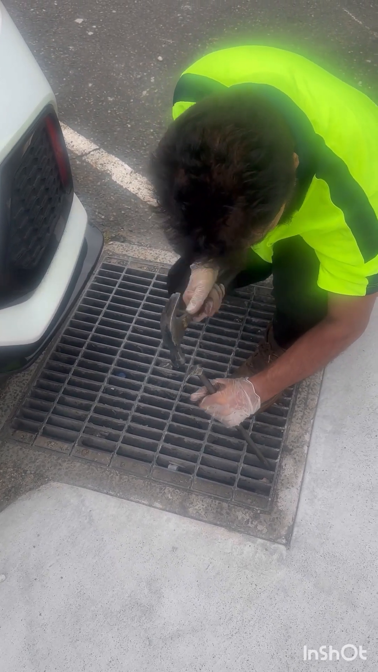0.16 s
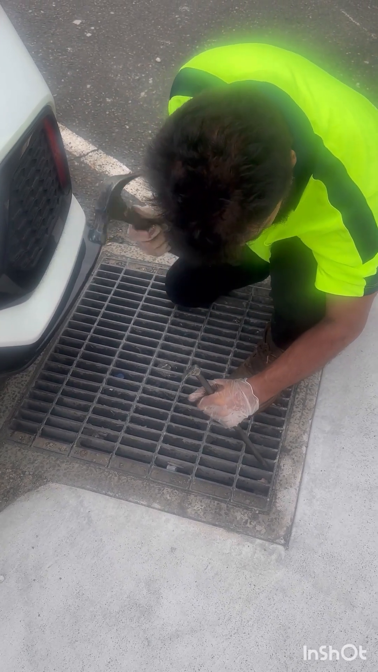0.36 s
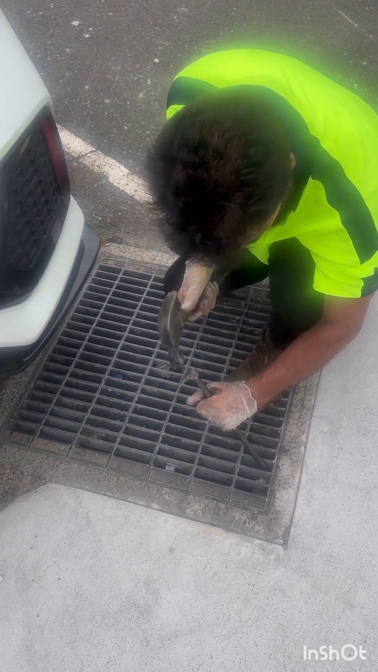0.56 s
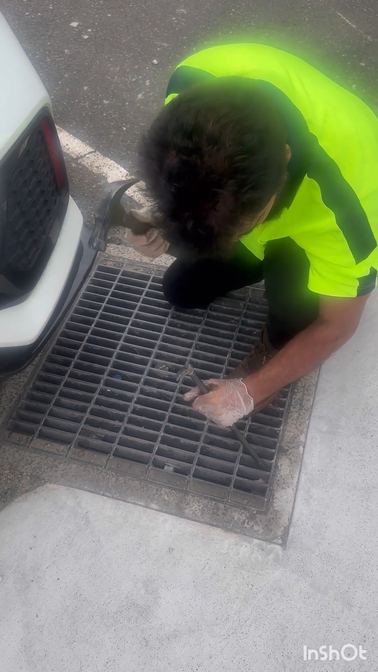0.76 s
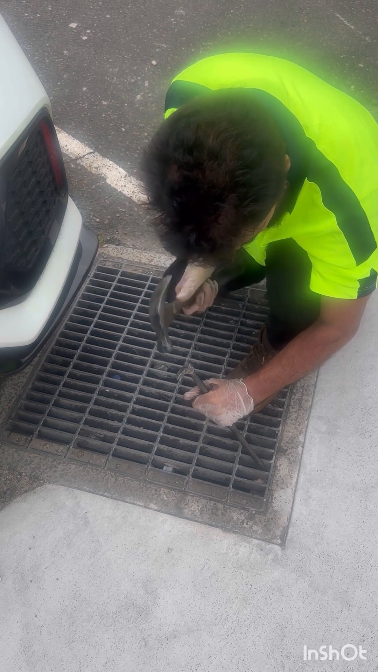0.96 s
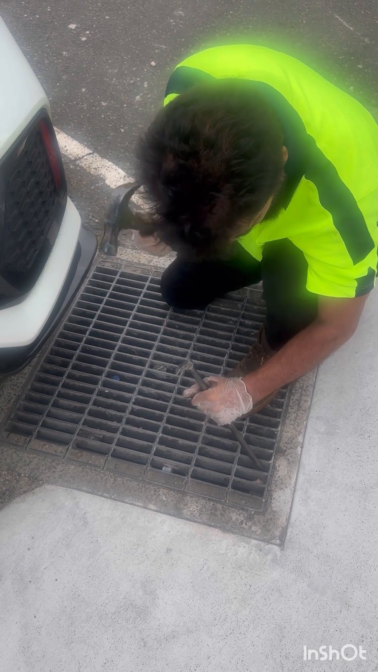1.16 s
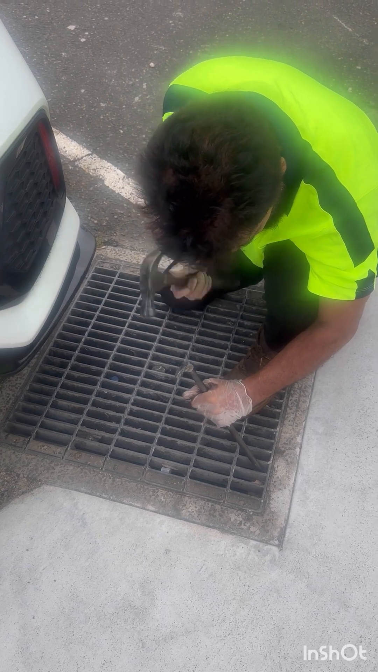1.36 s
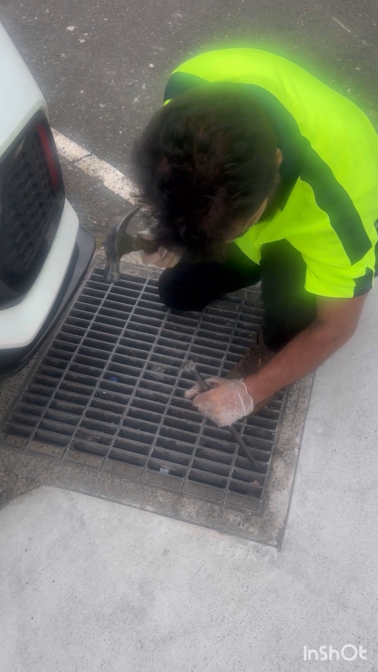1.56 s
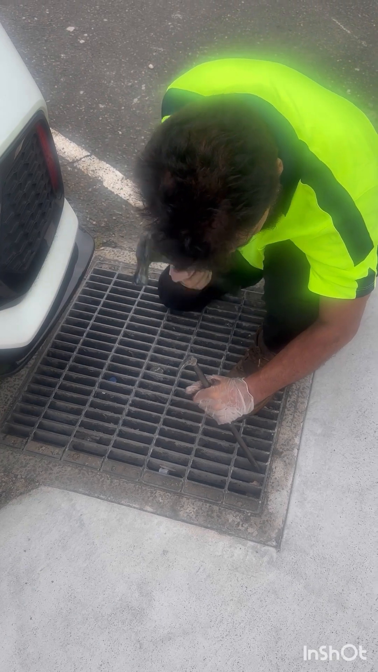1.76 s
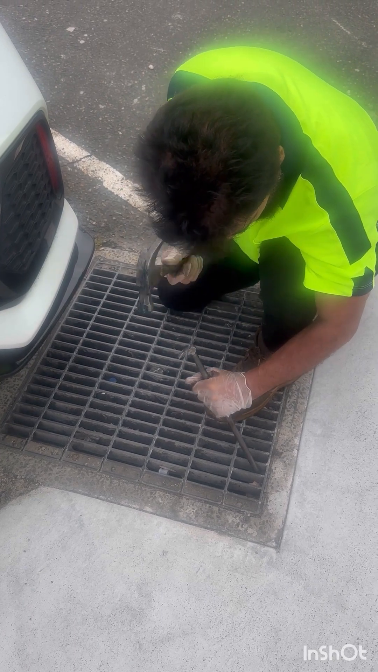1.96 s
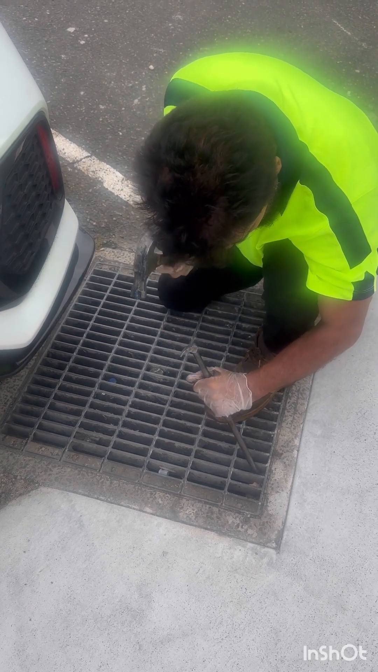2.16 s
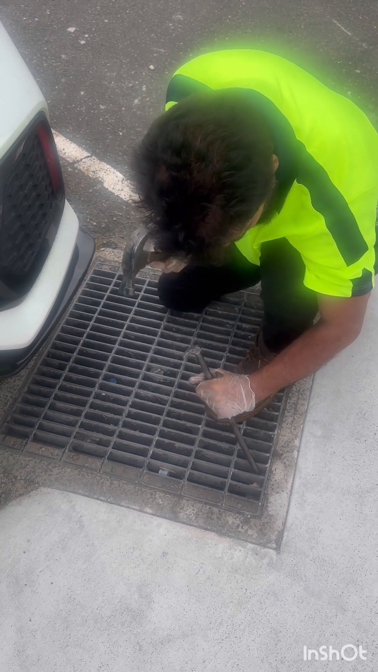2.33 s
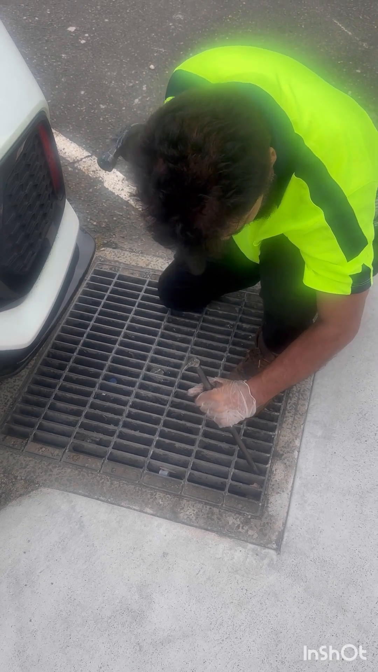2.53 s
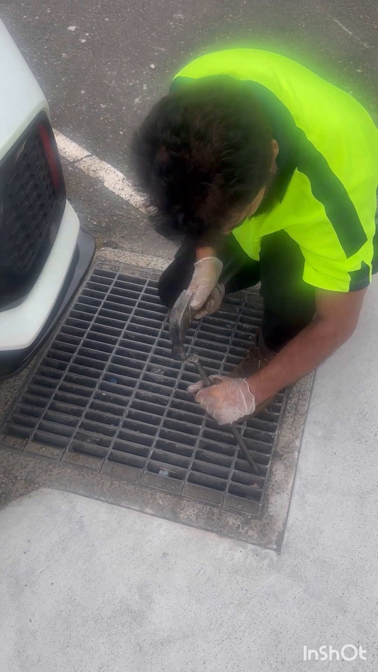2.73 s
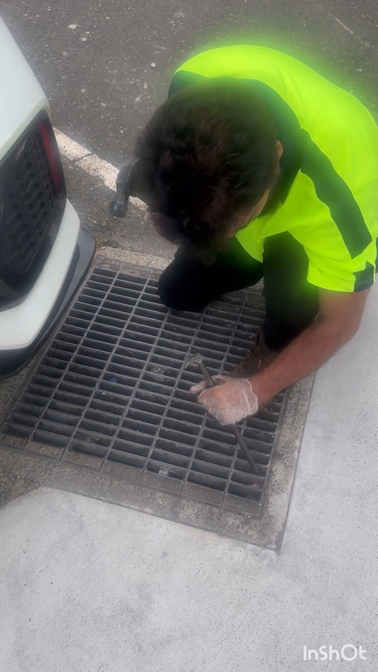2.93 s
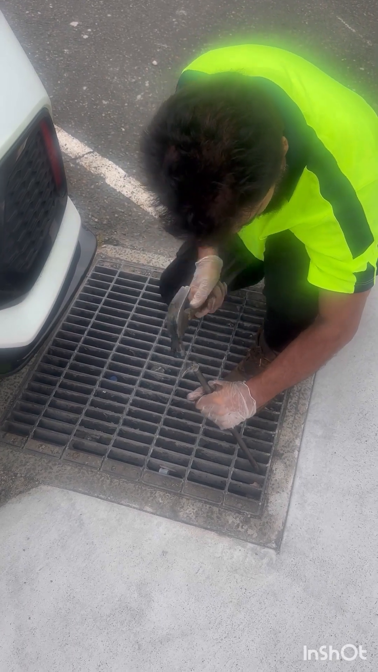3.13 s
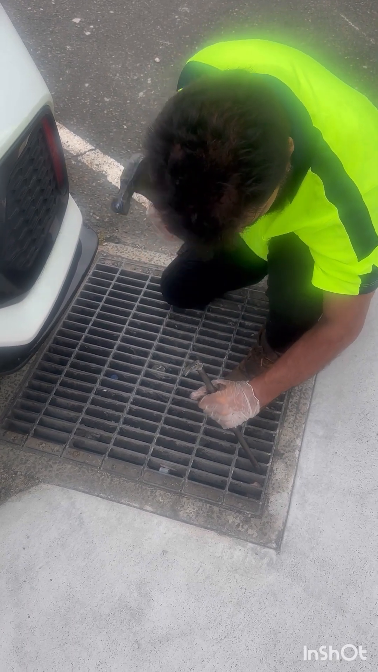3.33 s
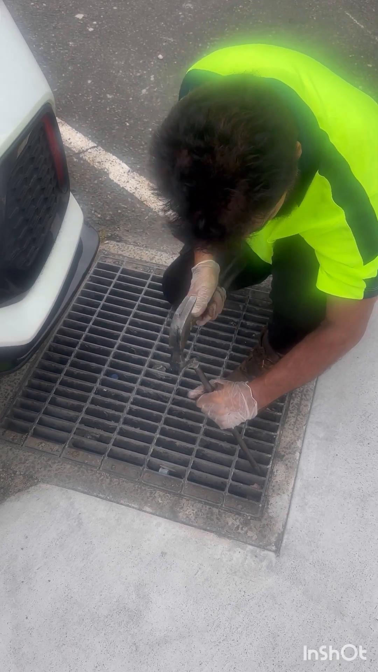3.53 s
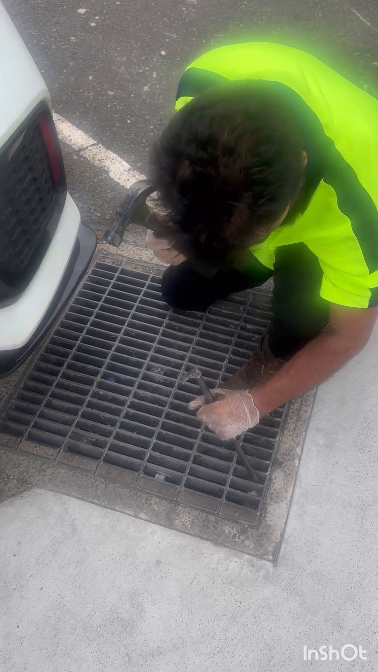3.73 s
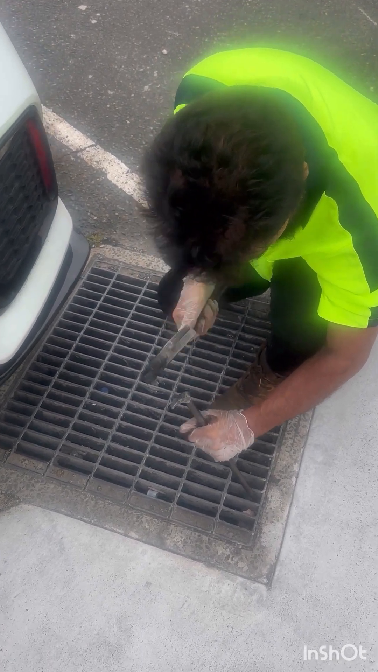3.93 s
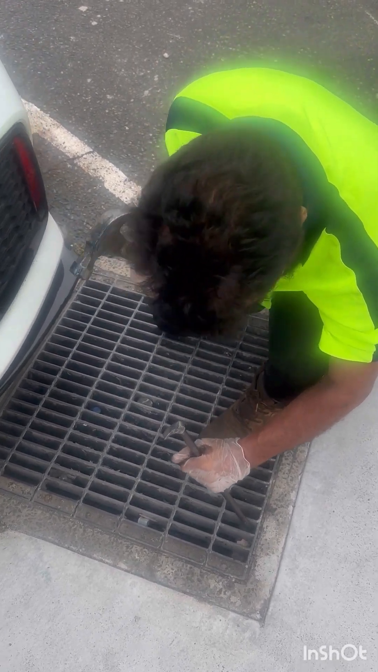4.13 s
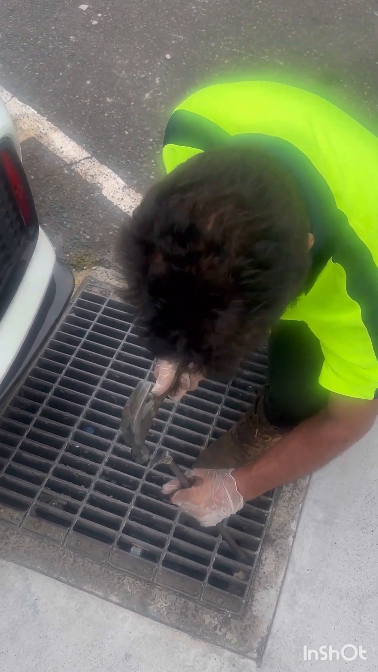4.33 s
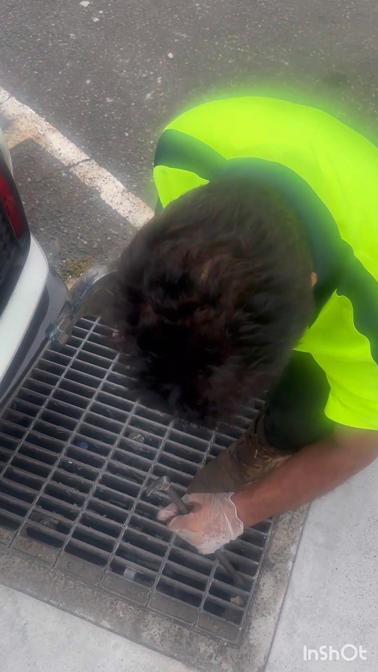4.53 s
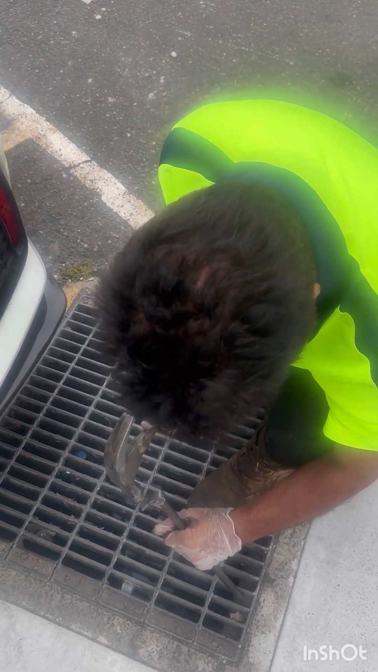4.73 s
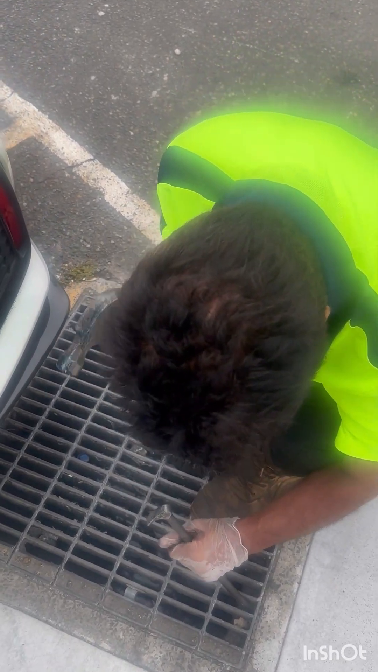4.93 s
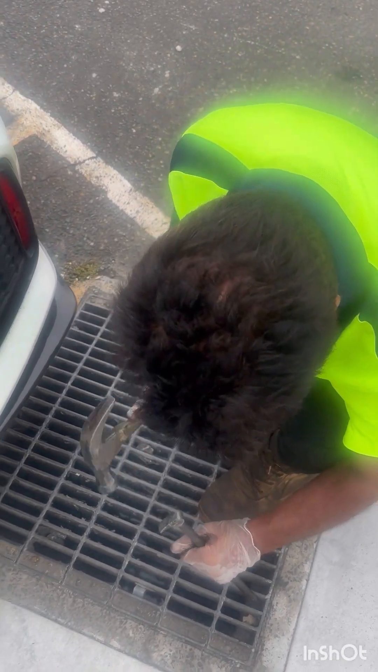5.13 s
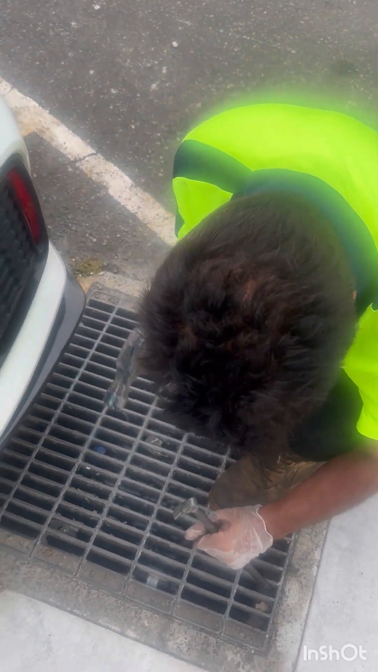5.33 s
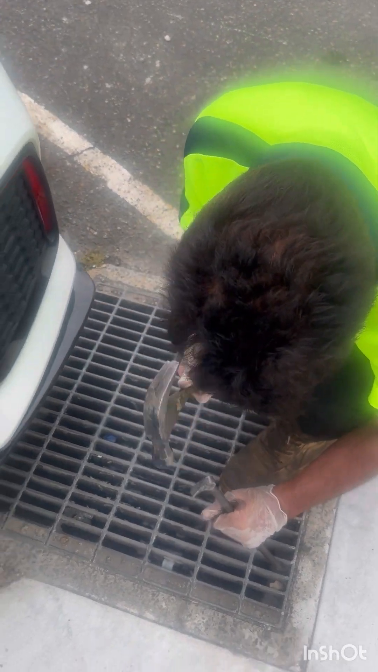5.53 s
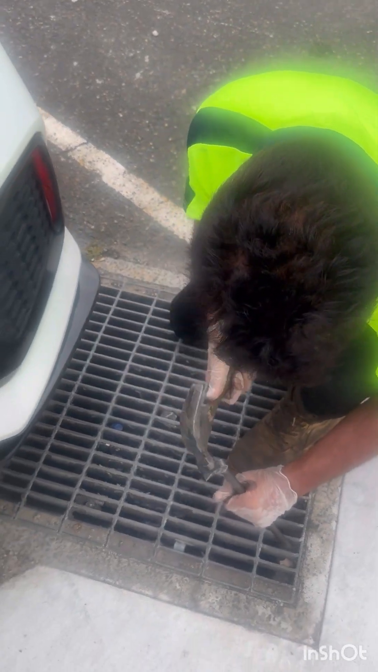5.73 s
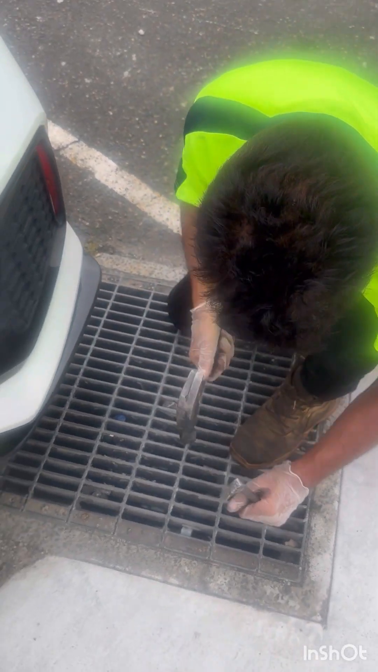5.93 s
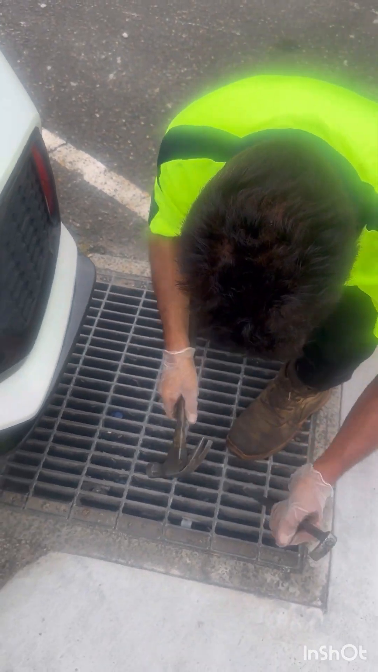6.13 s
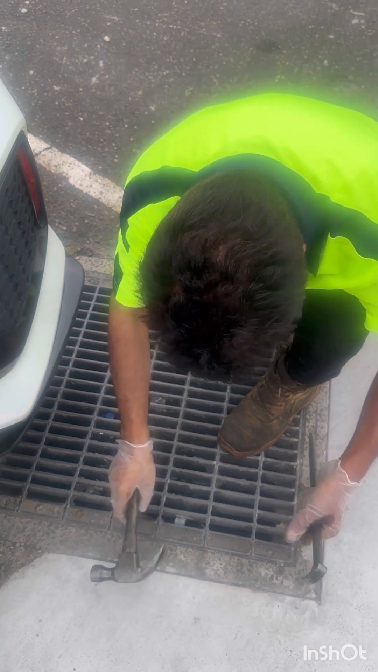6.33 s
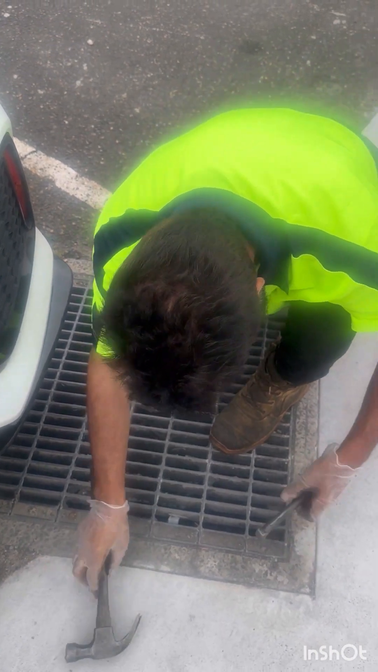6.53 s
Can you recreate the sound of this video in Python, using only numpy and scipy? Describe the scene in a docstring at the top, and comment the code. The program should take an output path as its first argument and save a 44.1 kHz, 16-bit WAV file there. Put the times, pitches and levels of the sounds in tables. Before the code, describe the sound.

Outdoors at a roadside drain, a phone close by picks up a hammer hitting a steel bar wedged in a metal grate. The tail of an earlier blow is present at the start, with soft wind buffeting that dies by about 2 s. Loud, piercing clanks land at 0.13, 0.55, 0.96, 1.37 and 1.78 s; the one at 0.96 carries a deep thump. After a missed beat, blows resume at 2.67 s and continue every 0.4 s or slightly faster until 5.72 s. Each is an abrupt bright crack, a dense short rattle with a tiny rebound, a quickly damped ring and a hissy echo from car and walls. Faint traffic rumble and engine hum lie beneath. From 6 s only echo, tiny ticks and scuffs remain; at 6.55 s the hammer taps concrete, slightly right, with small fading clinks until the end.

```python
"""Outdoors, at a drain grate near traffic: a hammer drives a steel bar wedged in the grate, close to a phone.
Each blow is a burst of contact noise that excites damped modes of bar and grate, a dense rattle and a thud,
all but the thud echoed by a car and far walls as decaying noise. The hammer is then laid on concrete, where it taps and rings.
Ticks, scuffs and a thin tone are faint; traffic is shaped noise with narrow hums; gusts buffet at first."""
import sys
import numpy as np
from scipy import signal
from scipy.fft import rfft, irfft, next_fast_len
from scipy.io import wavfile
from scipy.ndimage import map_coordinates

SR = 44100
rng = np.random.default_rng(int(sys.argv[2]) if len(sys.argv) > 2 else 0)


def to_wav(s):
    """Save 16-bit WAV."""
    ch = np.atleast_2d(s).T  # columns
    pcm = np.round(np.clip(ch, -1, 1) * 32767)  # PCM
    wavfile.write(sys.argv[1], SR, pcm.astype(np.int16))


N = 295029

# Hammer blows: (time [s], level [dB]; then relative to that level: first bar mode [dB], second bar mode [dB],
# treble bar mode [dB], low grate [dB], middle grate [dB], upper grate [dB], thud [dB];
# then rebound delay [s], rebound gain [dB])
BLOW_ROWS = [(0.1336, -3, -22.5, -28, -23.5, -31, -23, -26.5, -23, 0.023, 1.5),
             (0.5535, -5, -25, -22.5, -22, -29, -21.5, -25.5, -19.5, 0.029, 3),
             (0.9589, -5.5, -23.5, -18.5, -21, -27.5, -25, -27.5, 2, 0.024, 0.5),
             (1.3744, -3.5, -30, -24, -26, -27.5, -28, -29, -24, 0.02, -4),
             (1.7836, -4, -25.5, -18, -24, -24, -17.5, -24.5, -23.5, 0.0066, -3.5),
             (2.674, -2, -26, -20, -32, -26.5, -37, -30.5, -23, 0.019, 3),
             (3.0963, -3.5, -17.5, -23.5, -26.5, -25, -26.5, -28, -23.5, 0.0149, -1),
             (3.499, -3, -20.5, -30.5, -37, -29, -24.5, -27, -23.5, 0.023, 0),
             (3.8733, -4, -13, -34.5, -31.5, -31, -25, -30.5, -32, 0.017, 0.5),
             (4.2546, -3.5, -18, -19, -31.5, -26, -35.5, -29, -26.5, 0.02, -5),
             (4.6298, -4, -19.5, -18.5, -31, -24, -28.5, -27, -25.5, 0.013, -4.5),
             (5.0036, -4.5, -21.5, -23.5, -28, -30, -22.5, -26, -16.5, 0.016, 2.5),
             (5.3713, -5.5, -22.5, -16, -25.5, -19.5, -25, -26, -18, 0.016, -1.5),
             (5.719, -5.5, -19, -22.5, -21, -22, -21, -24, -21.5, 0.0092, 0.5)]
EARLIER_S = -0.48  # one more blow falls just before the start
LEAD = SR // 2  # samples kept ahead of the start for it


def blows():
    """Superposition: direct sound, low thud and echoes of successive blows add linearly."""
    direct, low = np.zeros(N + 3 * SR), np.zeros(N + 3 * SR)
    echoes = np.zeros((2, N + 3 * SR))
    t = np.arange(SR // 2) / SR
    for s, db, *bar_db, low_db, middle_db, upper_db, thud_db, again_s, again_db in [
            (EARLIER_S, *BLOW_ROWS[0][1:]), *BLOW_ROWS]:
        regions_db = [low_db, middle_db, upper_db]
        blow = amp(db) * strike(t, bar_db, regions_db, thud_db, again_s, again_db)
        at = LEAD + round(s * SR)
        direct[at:][:len(t)] += blow
        # the shock reaches both ports alike
        low[at + SR // 550:][:len(t)] += amp(db + thud_db) * push(t, width_s=0.0023)
        echo = reflected(blow)
        echoes[:, at + SR // 100:][:, :echo.shape[1]] += echo
    echoes = filtered(echoes, lambda hz: amp(along(ECHO_RESPONSE, hz)))
    return (near(direct) + low + far(echoes))[:, LEAD:LEAD + N]


# Centres of the low, middle and upper grate regions: (frequency [Hz])
REGION_CENTRES = [1200, 2000, 3600]


def strike(t, bar_db, regions_db, thud_db, again_s, again_db):
    """Impact excitation: a short contact force sets every part of the structure vibrating at once."""
    colour = list(zip(REGION_CENTRES, regions_db))  # where the blow lands decides which regions ring
    # the bar jumps and meets the grate again
    rebound = 1 + amp(again_db) * np.exp(-((t - again_s) / .0025) ** 2)
    rise = 1 - np.exp(-t / 0.0028)
    ringing = bar_ring(t, bar_db) + grate_ring(t, colour) * rebound + rattle(t, colour, rebound)
    return crack(t, colour) + rise * ringing + frame_knock(t, regions_db, thud_db)


# Spectrum of the steel contact: (frequency [Hz], relative level [dB])
CRACK_SPECTRUM = [(290, -54.5), (500, -25), (1850, -3), (3240, -7.5), (3750, -24.5), (4350, -16),
                  (5040, -19.5), (5670, -0.5), (6760, 4), (9490, -17), (12000, -38), (15400, -32),
                  (16800, -43)]


def crack(t, colour):
    """Contact noise: steel on steel radiates a broadband burst for a few milliseconds."""
    contact = (1 - np.exp(-t / 0.00015)) * np.exp(-(t / 0.0031) ** 2)
    burst = filtered(noise(CRACK_SPECTRUM, len(t)), lambda hz: amp(0.34 * along(colour, hz)))
    return amp(-5.5) * contact * unit(burst)


# First, second and treble bar modes before the hand damps them: (frequency [Hz], t60 [s])
BAR_MODES = [(6164, .16), (6750, .13), (8242, .13)]
# Highest bar modes: (frequency [Hz], relative level [dB], t60 [s])
TOP_MODES = [(14520, -12, .08), (15480, -6, .03), (15850, 0, .025)]
TOP_DB = -1.5  # the highest modes over the treble ring


def bar_ring(t, bar_db):
    """Modal vibration with added damping: the bar rings at fixed modes until the grip absorbs them."""
    modes = [(hz, level_db, t60) for (hz, t60), level_db in zip(BAR_MODES, bar_db)]
    bar = ring(modes, t, scatter_db=1.44, waver=0.024)
    bar = bar * (.12 + .88 * np.exp(-(t / .03) ** 4))  # the gripping hand soon damps the bar
    top = ring(TOP_MODES, t, scatter_db=6, waver=.05)
    return bar + amp(bar_db[-1] + TOP_DB) * top


# Separate grate modes: (frequency [Hz], level within their region [dB], t60 [s])
GRATE_MODES = [(1049, -6, .12), (1146, -5, .22), (1219, -2, .16), (1353, -1, .13), (1426, -6, .12),
               (1772, -3, .12), (1950, -13, .27), (1985, -5, .1), (2150, -3, .11), (2510, -17, .22),
               (2740, -2, .08), (3095, -7, .1), (3262, -3, .09), (3517, -1, .1), (3580, -12, .28),
               (4140, -2, .1), (4570, -9, .13), (4780, -8, .12), (5014, -8, .11), (5680, -9, .11)]


def grate_ring(t, colour):
    """Modal participation: the striking point sets how strongly each grate mode is driven."""
    modes = [(hz, level_db + along(colour, hz), t60) for hz, level_db, t60 in GRATE_MODES]
    return ring(modes, t, scatter_db=2.5, waver=.17)


# Spectrum imposed on the rattle: (frequency [Hz], relative level [dB])
RATTLE_SPECTRUM = [(290, -34), (500, -22.5), (930, -21), (1200, -14), (1600, -11.5), (1750, -6.5),
                   (2180, -6), (2390, -14.5), (3620, -2), (5330, -2), (6310, -3), (10000, -3.5),
                   (11000, -42.5), (14300, -67), (22000, -120)]
# Decay of the rattle: (frequency [Hz], t60 [s])
RATTLE_DECAY = [(300, 0.37), (800, 0.32), (2000, .13), (5500, 0.093), (14000, 0.036)]
RATTLE_DB = 8  # the rattle over the levels of the grate regions


def rattle(t, colour, rebound):
    """High modal density: modes too many to tell apart act as noise with a decay for each frequency."""
    chatter = amp(4.82 * map_coordinates(rng.standard_normal(200), [t * 300])) * rebound
    x = filtered(fading(RATTLE_DECAY, len(t)) * chatter, lambda hz: amp(along(RATTLE_SPECTRUM, hz)))
    x = x / x[:SR // 200].std()  # level set over the first 5 ms
    return filtered(x, lambda hz: amp(along(colour, hz) + RATTLE_DB))


# Modes of the grate's frame: (frequency [Hz], relative level [dB], t60 [s])
FRAME_MODES = [(314.4, -1, 0.076), (632.3, -11, .07), (872.4, -11.5, 0.12)]
KNOCK_DB, SHAKE_DB = 2, -22.5  # gain over the grate's mean level; gain of what the thud adds [dB]


def frame_knock(t, regions_db, thud_db):
    """Coupled vibration: grate and thud together drive the low modes of the frame."""
    drive = amp(np.mean(regions_db) + KNOCK_DB) + amp(thud_db + SHAKE_DB)
    onset = 1 - np.exp(-t / 0.0031)
    return drive * ring(FRAME_MODES, t, scatter_db=3.5, waver=0.17) * onset


# Decay of the echo from car and kerb: (frequency [Hz], t60 [s])
NEAR_DECAY = [(300, 0.46), (1500, 0.11), (5000, 0.31), (10000, 0.26)]
# Decay of the echo from the far walls: (frequency [Hz], t60 [s])
FAR_DECAY = [(300, 0.9), (1500, 0.68), (5000, 0.99), (10000, 1)]


def reflected(blow):
    """Reverberation by convolution: scattered reflections form a noise-like impulse response."""
    close, distant = [fading(t60, (2, SR)) for t60 in (NEAR_DECAY, FAR_DECAY)]
    tail = amp(-12.5) * close / np.linalg.norm(close[0])
    tail = tail + amp(-26.5) * distant / np.linalg.norm(distant[0])
    return signal.fftconvolve(blow[None], tail, axes=1)


# Filter that blows() puts on all echoes: (frequency [Hz], gain [dB])
ECHO_RESPONSE = [(300, -1), (1000, -4), (3000, -0.5), (3600, -2), (5000, -1.5), (6200, -7), (6800, -0.5),
                 (9000, -4), (10300, -8), (10600, -52), (17000, -57)]
# Contacts of the hammer laid down: (time [s], level [dB], ring relative to that level [dB])
CONTACTS = [(6.538, -28, -23), (6.554, -16.5, -9), (6.5947, -32.5, -8), (6.6121, -36, -3.5),
            (6.627, -36, -27), (6.6338, -40.5, -16), (6.6529, -44, -22)]
# Modes of the hammer: (frequency [Hz], relative level [dB], t60 [s])
HAMMER_MODES = [(1193, -19, 0.091), (1790, -13, 0.039), (2170, -7, 0.033), (2760, -25, 0.023),
                (3100, -16.5, 0.038), (3500, -23, 0.067), (4040, -17.5, 0.023), (4500, -32.5, 0.051),
                (4760, -9, 0.039), (7770, -3, 0.03)]
# Spectrum of steel on concrete: (frequency [Hz], relative level [dB])
TAP_SPECTRUM = [(180, -33), (300, -2.5), (709, 3), (1560, -8), (2340, -0.5), (4760, -6), (6020, -23.5),
                (7890, -7), (8730, -36), (11600, -92), (15700, -33.5), (16800, -72)]


def laid_down():
    """Repeated impact: the hammer head taps the concrete, rocks, and rings briefly in its own modes."""
    out, t = np.zeros(N + SR), np.arange(SR // 5) / SR
    for s, db, ring_db in CONTACTS:
        short = amp(-0.5 - 60 * t / 0.0078) * (1 - np.exp(-t / .0003))
        long = amp(-17.0 - 60 * t / 0.069) * (1 - np.exp(-t / 0.00059))
        tap = short * noise(TAP_SPECTRUM, len(t)) + long * noise(TAP_SPECTRUM, len(t))
        head = (1 - np.exp(-t / 0.00033)) * ring(HAMMER_MODES, t, scatter_db=4.5)
        out[round(s * SR):][:len(t)] += amp(db) * (tap + amp(ring_db) * head)
    return near(out[:N]) * amp([[-2], [2]])  # stronger on the right


def small_sounds():
    """Superposition of weak sources: ticks and scuffs form a diffuse field, the tone is central."""
    return far(ticks() + scuffs()) + thin_tone()


# Faint ticks: (time [s], level [dB], centre [Hz], 1/e half-width [Hz], t60 [s])
TICK_ROWS = [(1.938, -51.5, 2010, 1800, 0.12), (5.334, -47, 1970, 900, 0.073),
             (5.97, -60, 2100, 300, 0.049), (5.971, -63, 8800, 2500, .03),
             (6.124, -60.5, 6000, 6240, 0.015), (6.29, -73, 8660, 2500, .04),
             (6.357, -77, 8300, 1500, 0.019)]


def ticks():
    """Band-limited transients: narrow noise under a fast exponential decay is heard as a tick."""
    out, t = np.zeros((2, N + SR)), np.arange(SR // 5) / SR
    for s, db, hz, width_hz, t60 in TICK_ROWS:
        envelope = amp(db - 60 * t / t60) * (1 - np.exp(-t / .001))
        out[:, round(s * SR):][:, :len(t)] += envelope * narrow_band(hz, width_hz, len(t))
    return out[:, :N]


# Scuffs on the ground: (time [s], length [s], dull level [dB], bright level [dB])
SCUFF_ROWS = [(6.04, .08, -67.5, -87.5), (6.472, .06, -81, -72.5)]
SWELL_DB_PER_S, STOP_DB_PER_S = 250, 900


def scuffs():
    """Friction noise: fluctuating dull and bright bands fade in and out around each stroke."""
    now = np.arange(N) / SR
    dull = noise([(500, -30.5), (1000, -1), (2200, -9.5), (4000, -19.0), (8000, -45.0)], (2, N))
    bright = noise([(3000, -29), (5500, 0.5), (9000, -1), (11000, -20.0), (15000, -7.0), (17000, -34.5)],
                   (2, N))
    out = 0
    for s, length, dull_db, bright_db in SCUFF_ROWS:
        swell_db, stop_db = SWELL_DB_PER_S * (now - s), STOP_DB_PER_S * (s + length - now)
        stroke = amp(np.minimum(swell_db, stop_db).clip(max=0))
        out = out + stroke * (amp(dull_db) * dull + amp(bright_db) * bright)
    return out * amp(4 * wobble(93))


# Faint thin tone: (time [s], length [s], mean frequency [Hz], rms level [dB])
TONE_ROWS = [(2.866, 0.076, 2095, -69), (2.95, .11, 2070, -68)]


def thin_tone():
    """Frequency modulation: the phase of a sine is the running sum of a wandering pitch."""
    now, out = np.arange(N) / SR, 0
    edge = lambda x: np.clip(x / 0.013, 0, 1)
    for s, length, hz, db in TONE_ROWS:
        phase = 2 * np.pi * np.cumsum(hz + 20 * wobble(30)) / SR
        out = out + np.sqrt(2) * amp(db) * edge(now - s) * edge(s + length - now) * np.sin(phase)
    return out


# Street levels: (time [s], rumble level [dB], hiss level [dB])
STREET_LEVELS = [(0, -47, -55), (.6, -49, -62), (1.3, -51.5, -65.5), (2.1, -56.5, -71.5), (2.5, -48.5, -70),
                 (3.05, -49.5, -67), (3.3, -54, -65.5), (3.75, -46, -64), (4.6, -49, -69),
                 (5.3, -48.5, -69.5), (5.9, -50.5, -75), (6.69, -47.5, -74)]
# Spectrum of the rumble: (frequency [Hz], relative level [dB])
RUMBLE_SPECTRUM = [(15, -30.5), (25, -14.5), (49, 6), (75, 2.5), (133, 1), (200, -17.5), (260, -32),
                   (440, -120)]
# Spectrum of the traffic: (frequency [Hz], relative level [dB])
TRAFFIC_SPECTRUM = [(88, -23), (150, -1), (167, -6.5), (257, -2), (327, -10), (454, -8), (505, -16),
                    (618, -15.5), (909, -17), (1500, -33.5), (1950, -62), (3300, -120)]
# Spectrum of the far hiss: (frequency [Hz], relative level [dB])
HISS_SPECTRUM = [(710, -31.5), (1200, 0.5), (1650, -6.5), (2090, -3.5), (2410, -12.5), (2600, -6),
                 (10500, -25.5), (13600, -63), (22000, -120)]
TRAFFIC_DB, RECEDE_DB_PER_S = -53, 0.88  # level at the start; the traffic draws slowly away


def street():
    """Incoherent summation: many distant sources merge into slowly fluctuating coloured noise."""
    rumble_db, hiss_db = curves(STREET_LEVELS)
    rumble = amp(rumble_db + 1.1 * wobble(9.2)) * noise(RUMBLE_SPECTRUM, (2, N))
    traffic_db = TRAFFIC_DB - RECEDE_DB_PER_S * np.arange(N) / SR + 0.59 * wobble(1.8) + 2.0 * wobble(10)
    traffic = amp(traffic_db) * noise(TRAFFIC_SPECTRUM, (2, N))
    hiss = amp(hiss_db + 0.96 * wobble(2.5)) * noise(HISS_SPECTRUM, (2, N))
    return far(rumble + traffic + hiss + engines(rumble_db))


# Engine hums: (frequency [Hz], level [dB], 1/e half-width [Hz])
ENGINE_HUMS = [(115, -64, 24), (277.5, -69.5, 7.1), (590, -75.5, 6)]
# Drone of a passing engine: (time [s], level [dB])
DRONE_LEVELS = [(1.2, -76), (1.6, -64), (2.3, -66), (2.7, -76), (3.2, -74), (3.45, -64.5), (3.9, -76)]
DRONE_HZ = 464
IDLE_DB = -2  # an idling engine's lowest hum over the rumble


def engines(rumble_db):
    """Narrow-band radiation: an unsteady periodic source is heard as a hum of finite bandwidth."""
    hums = sum(amp(db + 1.9 * wobble(2.0)) * narrow_band(hz, width_hz, N) for hz, db, width_hz in ENGINE_HUMS)
    drone = amp(curves(DRONE_LEVELS)[0]) * narrow_band(DRONE_HZ, 5, N)
    idle = amp(rumble_db + IDLE_DB + 1.5 * wobble(2.5)) * narrow_band(68.2, 3.4, N)
    return hums + drone + idle


# Wind strength: (time [s], level [dB])
WIND_LEVELS = [(0, -25.5), (.16, -36.5), (.2, -51.5), (.34, -35), (.45, -41), (.51, -32.5), (.58, -40),
               (.69, -54.5), (.77, -38.5), (.9, -51.5), (1.04, -39), (1.15, -35.5), (1.22, -51.5),
               (1.34, -48.5), (1.55, -46), (1.9, -70), (2, -100)]
# Spectrum of the gusts: (frequency [Hz], relative level [dB])
GUST_SPECTRUM = [(12, -35), (20, -12), (33, 0), (57, 2.5), (116, -11.5), (156, -21), (255, -19.5),
                 (400, -36.5), (520, -46), (880, -120)]
# A puff of air on the ports: (time [s], level [dB])
PUFF_EVENT = (1.055, -29)


def wind():
    """Turbulent pressure: lumpy low noise and one sharp puff, the same on both channels."""
    level_db, = curves(WIND_LEVELS)
    buffeting = amp(level_db + 1.4 * wobble(30) + 1.5 * wobble(14)) * noise(GUST_SPECTRUM, N)
    puff_s, puff_db = PUFF_EVENT
    after = np.clip(np.arange(N) / SR - puff_s, 0, .1)
    return buffeting + amp(puff_db) * push(after, width_s=0.0016)


# Port difference for diffuse sound: (frequency [Hz], level relative to the sum [dB])
DIFFUSE_SIDE = [(60, -41), (110, -27.5), (200, -21), (380, -8.5), (700, 1.5), (1290, -3), (2380, -4.5),
                (4400, -4), (8120, -1), (15000, 8.5)]


def far(pair):
    """Diffuse field: unrelated sum and difference signals give sound without a direction."""
    return ports(pair[0], filtered(pair[1], lambda hz: amp(along(DIFFUSE_SIDE, hz))))


# Port difference for a close source: (frequency [Hz], level relative to the sum [dB])
DIRECT_SIDE = [(60, -22.5), (99, -4.5), (160, -5), (270, -9.5), (450, -4), (740, 4), (1220, -3.5),
               (2010, -14), (3330, -1), (5500, -9.5), (9080, 6), (15000, 17.5)]
# Phase by which the difference leads the sum: (frequency [Hz], phase [rad])
SIDE_PHASE = [(200, 1.5), (500, 1.1), (1000, 1.0), (2000, 1.1), (4000, 1.5), (8000, 1.57), (15000, 1.57)]


def near(x):
    """Near field: a close source reaches the two ports with a phase shift that depends on pitch."""
    turned = lambda hz: amp(along(DIRECT_SIDE, hz)) * np.exp(1j * along(SIDE_PHASE, hz))
    return ports(x, filtered(x, turned))


def ports(mid, side):
    """Sum-and-difference stereo: left and right are the sum plus and minus the difference."""
    return np.array([mid + side, mid - side])


def ring(modes, t, scatter_db, waver=0):
    """Modal synthesis: damped sines at new strengths; loose contact wavers their phase [cycles]."""
    out = 0
    for hz, db, t60 in modes:
        wander = waver * map_coordinates(rng.standard_normal(60), [t * 100])
        decay = amp(db + scatter_db * rng.normal() - 60 * t / t60)
        out = out + decay * np.sin(2 * np.pi * (hz * t + rng.random() + wander))
    return out


def push(t, width_s):
    """Critically damped response: one soft low pulse of peak 1."""
    return t / width_s * np.exp(1 - t / width_s)


def narrow_band(hz, width_hz, size):
    """Band-pass filtering: two channels of noise under a Gaussian band, rms 1 overall."""
    band = lambda f: np.exp(-((f - hz) / width_hz) ** 2)
    return unit(filtered(rng.standard_normal((2, size)), band))


def noise(spectrum, size):
    """Spectral shaping: white noise filtered to a spectrum, rms 1."""
    return unit(filtered(rng.standard_normal(size), lambda hz: amp(along(spectrum, hz))))


def fading(t60, size):
    """Frequency-dependent decay: white noise whose every frequency dies at its own speed."""
    hz, t, z = signal.stft(rng.standard_normal(size), SR, nperseg=128)
    z = z * amp(-60 * t / along(t60, hz)[:, None])
    return signal.istft(z, SR, nperseg=128)[1][..., :np.max(size)]


def filtered(x, response):
    """Linear filtering: the spectrum of x times a complex response of frequency."""
    n = x.shape[-1]
    m = next_fast_len(n + 8192)
    return irfft(rfft(x, m) * response(np.fft.rfftfreq(m, 1 / SR)), m)[..., :n]


def wobble(rate):
    """Slow random modulation: a smooth curve through random knots, rate knots a second."""
    return map_coordinates(rng.standard_normal(int(N * rate / SR) + 4), [np.arange(N) * rate / SR])


def curves(rows):
    """Linear interpolation in time: one value per sample for each column after the time."""
    s, *cols = np.transpose(rows)
    return [np.interp(np.arange(N) / SR, s, c) for c in cols]


def along(points, hz):
    """Logarithmic pitch scale: (frequency [Hz], value) points interpolated on a log axis."""
    f, v = np.transpose(points)
    return np.interp(np.log(hz + 1), np.log(f + 1), v)


def amp(db):
    """Decibel definition: 20 dB is a factor of ten in amplitude."""
    return 10 ** (np.asarray(db) / 20)


def unit(x):
    """Normalisation: scale to a root mean square of 1."""
    return x / np.sqrt(np.mean(x ** 2) + 1e-20)


def scene():
    """Superposition: all sources add at the ports."""
    return blows() + laid_down() + small_sounds() + street() + wind()


TOP_HZ = 16990  # band limit


def record(dry):
    """Transducer response: bass is cut and delayed, peaks saturate softly, and the band is limited."""
    cut = lambda hz: (1j * hz / (34 + 1j * hz)) ** 3
    # about a cycle late between 12 and 1500 Hz
    delay = lambda hz: np.exp(2j * np.pi * .95 * np.log(1500 / np.clip(hz, 12, 1500)))
    late = filtered(dry, lambda hz: cut(hz) * delay(hz))
    soft = late / (1 + np.abs(late / .84) ** 4) ** (1 / 4)
    return filtered(soft, lambda hz: hz < TOP_HZ)


dry = scene()
out = record(dry)
to_wav(out)
```